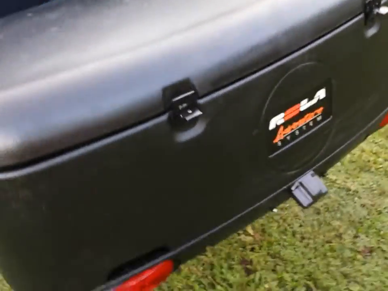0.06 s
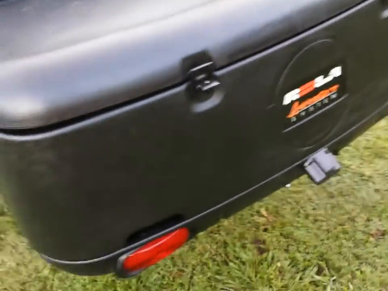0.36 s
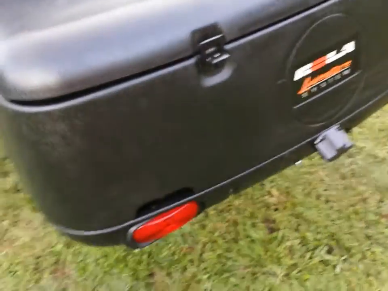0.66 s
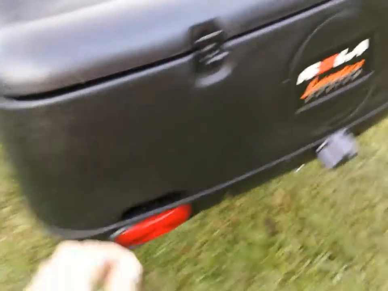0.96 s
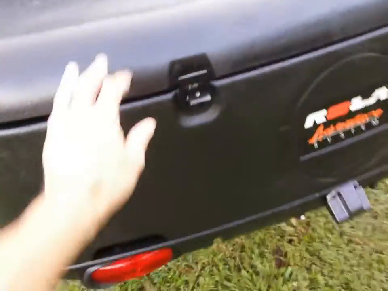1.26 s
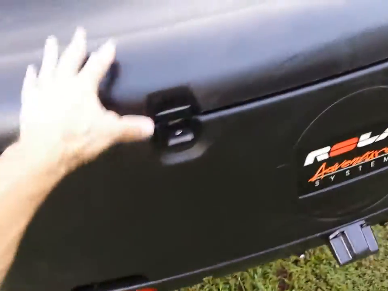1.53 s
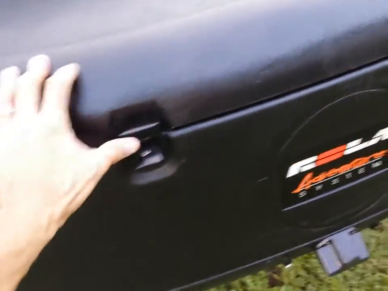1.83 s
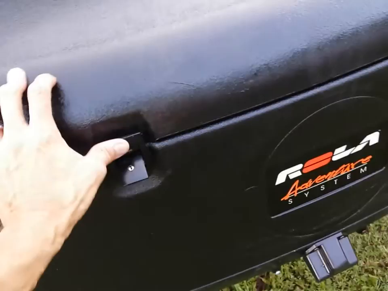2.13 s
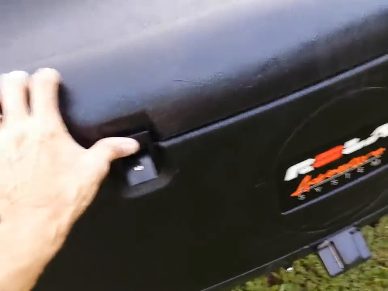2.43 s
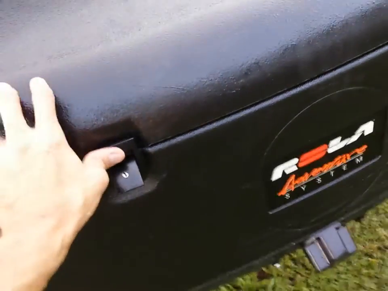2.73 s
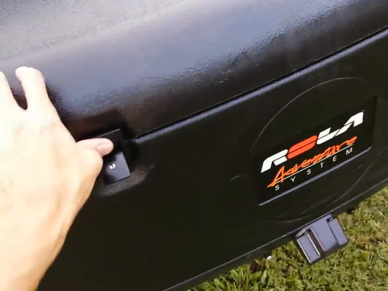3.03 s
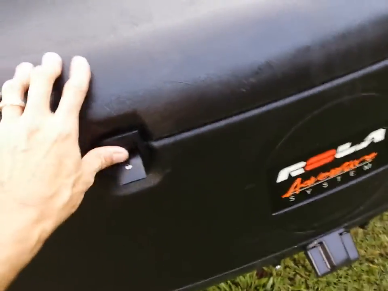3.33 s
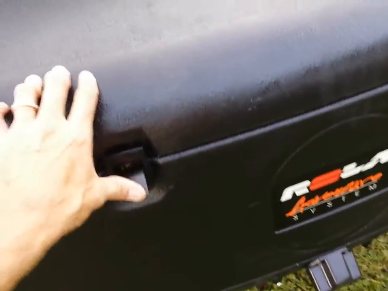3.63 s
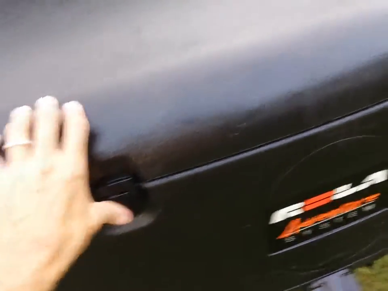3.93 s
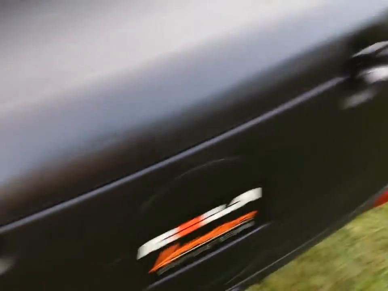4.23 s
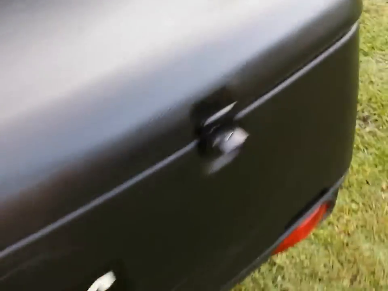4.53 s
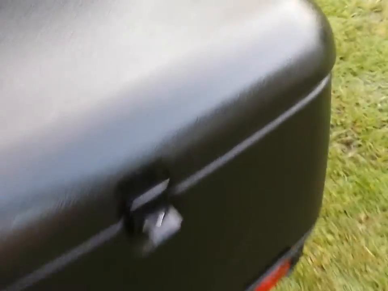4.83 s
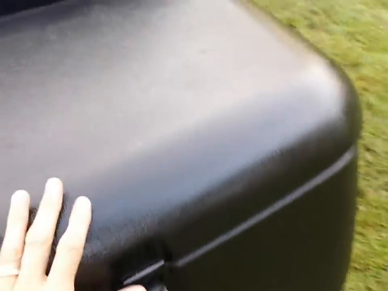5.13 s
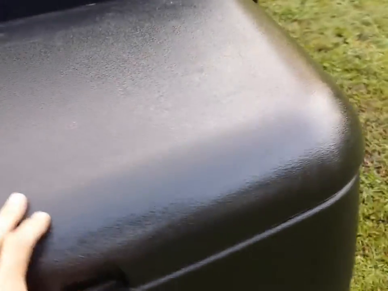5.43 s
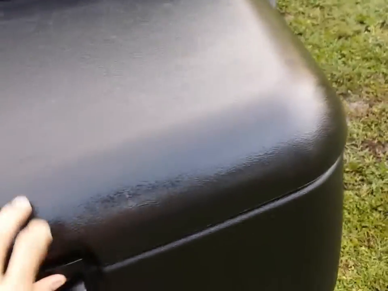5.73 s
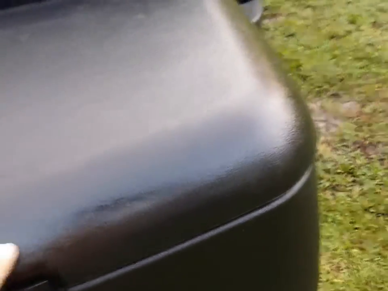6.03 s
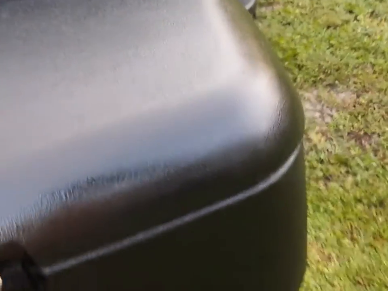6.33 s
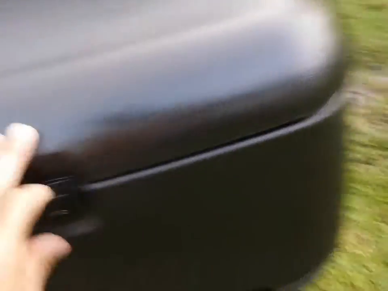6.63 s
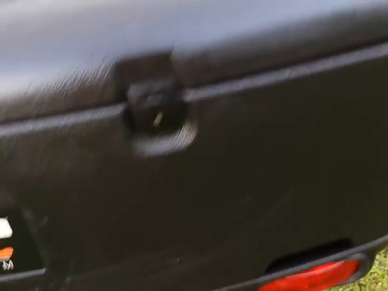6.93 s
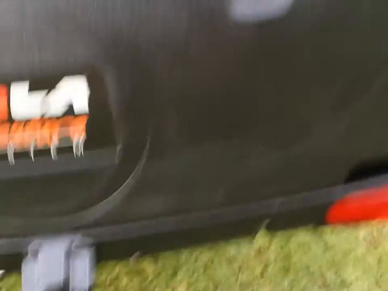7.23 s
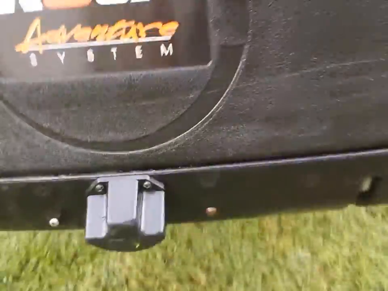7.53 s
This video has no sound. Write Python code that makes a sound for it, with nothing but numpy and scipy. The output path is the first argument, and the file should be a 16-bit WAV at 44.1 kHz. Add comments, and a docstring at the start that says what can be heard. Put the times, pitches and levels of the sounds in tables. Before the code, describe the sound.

Outdoors, faint high crickets chirp over a quiet, distant rumble. After a soft rustle and bump around 1.5 seconds, a hand works a metal latch on a hollow plastic cargo box, close to the microphone. It clicks sharply at 2 seconds, then snaps at 2.3 with a deep thump of the lid, the loudest moment. Soft, dull knocks follow until 3 seconds. Another click comes at 3.2 and a quick cluster of steely clacks and hollow thuds at about 3.7. Light taps and rustles of clothing and grass fill 4 to 5.3 seconds. A second latch snaps at 5.4, ticks lightly, and snaps again at 6.2, trailed by a brief hiss. The hits are short, with a slight dull echo. The crickets and rumble sink from about 5.6 seconds, and the rumble returns with a faint rustle near the end at 7.5.

```python
"""Crickets chirp on a lawn over a distant rumble; then a hand works the metal latches of a
hollow plastic cargo box, the loudest thing in the scene. Each blow is a steel tick, a crack of the
lever, a clack of the shell, a thud of the panels and a boom of the lid, with dull echoes off nearby
walls. Clothes and grass rustle in tiny grains, and the crickets' wing strokes make a high trill."""
import sys
import numpy as np
from scipy import signal
from scipy.fft import rfft, irfft, next_fast_len
from scipy.io import wavfile

SR = 44100
rng = np.random.default_rng(int(sys.argv[2]) if len(sys.argv) > 2 else 0)


def file_out(sig):
    """Save sig as 16-bit WAV at sys.argv[1]."""
    # one column per channel
    cols = np.atleast_2d(sig).T
    # limit, then scale
    lim = np.clip(cols, -1, 1)
    pcm = np.round(lim * 32767).astype(np.int16)
    wavfile.write(sys.argv[1], SR, pcm)


N = 333875
TIME = np.arange(N) / SR
BLOW_AGE = np.arange(int(.36 * SR)) / SR
BAND_TOP_HZ, HISS_TOP_HZ = 16300, 15600


def latches(metal_db=-1):
    """Every blow rings five parts; the heavier the part, the slower its attack and its first fall."""
    blows = np.array([*snaps(), *hook_ticks(), *knocks(), *lid_jolts()])
    starts, contacts, steel_db, lever_db, shell_db, panel_db, lid_db, steel_tilt, shell_tilt = blows.T
    timing = list(zip(starts, contacts))
    metal = steel_tick(timing, steel_db, steel_tilt) + lever_crack(timing, lever_db)
    box = shell_clack(timing, shell_db, shell_tilt)
    box += panel_thud(timing, panel_db) + lid_boom(timing, lid_db)
    box += wall_push(starts, shell_db + 13, width_s=.00018)
    box += wall_push(starts, panel_db + 14, width_s=.0006)
    return gain_of(metal_db) * metal + with_echoes(box)


# Latch snaps: start_s, contact_s, level_db, steel_over_shell_db, weight_db, steel_tilt_db_per_octave
LATCH_SNAPS = [(2.0279, 0.0021, -25, -5.5, -8.5, 2), (2.333, 0.00055, -22.5, -1, 0, -5),
               (3.2485, 0.0017, -29, -1.5, 0.5, 1), (3.694, .001, -27, -.5, -5.5, 10.5),
               (3.7112, .0026, -32, -9.5, 2.5, 1), (3.7247, 0.0019, -25.5, -20, -2.5, -7),
               (3.749, 0.0014, -27.5, 2, 9, -3), (5.3826, .0009, -24.5, -3.5, -15.5, -3),
               (5.384, .0015, -25, 5.5, 1, -3.5), (6.2217, .01, -34, -5, -3.5, 10),
               (6.2357, 0.00078, -26.5, 5, 0.5, 5.5)]
def snaps():
    """The lever springs or slams home; the more weight reaches the box, the deeper and duller the hit."""
    for start_s, contact_s, db, steel_db, weight_db, steel_tilt in LATCH_SNAPS:
        lever_db = -9 + .49 * steel_db - .5 * weight_db
        parts_db = db + np.array([steel_db, lever_db, 0, weight_db + 1, weight_db - 9])
        yield start_s, contact_s, *parts_db, steel_tilt, -.64 * weight_db


# Small ticks of the hook: start_s, contact_s, level_db
HOOK_TICKS = [(2.0071, 0.0011, -43.5), (2.278, 0.0052, -40), (2.3416, 0.00058, -38), (5.513, .0013, -58),
              (6.037, .0025, -55), (6.0747, .0014, -51.5), (6.146, 0.01, -40), (6.529, 0.0024, -59.5)]
def hook_ticks(steel_tilt=5, shell_tilt=2):
    """The loose hook touches its keeper: light steel that hardly stirs the box."""
    for start_s, contact_s, db in HOOK_TICKS:
        parts_db = db + np.array([0, -15, -12, -13, -15])  # steel, lever, shell, panels, lid
        yield start_s, contact_s, *parts_db, steel_tilt, shell_tilt


# Handling knocks: start_s, level_db, hardness_db_per_octave
SHELL_KNOCKS = [(1.585, -45, -3), (2.004, -41, 0), (2.283, -42, 8), (2.501, -48.5, 5), (2.662, -38.5, -7),
                (2.7517, -36, -5), (2.812, -42.5, -8.5), (2.973, -46, -8), (3.022, -41.5, -8),
                (3.6338, -38, 2.5), (3.646, -41.5, 2), (4.3162, -46, 9), (4.369, -45, 7), (5.137, -43.5, 0),
                (5.297, -49, 3.5), (5.3141, -42.5, -5), (5.523, -41.5, -8.5), (6.545, -58.5, 1.5),
                (6.99, -58, 6)]
def knocks(contact_s=.0028, steel_tilt=3):
    """Thumb and lever knock on the shell; a harder knock is brighter and rattles the latch more."""
    for start_s, db, hardness in SHELL_KNOCKS:
        parts_db = db + np.array([hardness - 12, hardness - 16, 0, -4, -10])
        yield start_s, contact_s, *parts_db, steel_tilt, hardness


# Low bumps of the lid: start_s, level_db, lid_over_panels_db
LID_JOLTS = [(2.004, -37, 9.5), (2.283, -36, 25), (2.333, -16, 11.5), (2.485, -34.5, 7), (3.696, -28, 7),
             (3.971, -38.5, 2), (5.3151, -39, -0.5), (6.274, -38, -8)]
def lid_jolts(contact_s=.0016, steel_tilt=0, shell_tilt=-2):
    """The lid jumps or settles on its rim as a whole: a boom with little clack and almost no metal."""
    for start_s, db, depth_db in LID_JOLTS:
        parts_db = db - depth_db + np.array([-23, -23, -12, 0, depth_db])
        yield start_s, contact_s, *parts_db, steel_tilt, shell_tilt


# Bright ring of the steel: pitch_hz, level_db, t60_s
STEEL_RING = [(5030, -8, 0.043), (5600, -3, .03), (5870, 9, 0.034), (6400, -9, 0.03), (7950, 1, 0.011),
              (7950, -7.5, 0.039), (8500, -3, 0.024), (8990, 0, 0.026)]
# Its wash of weaker modes: pitch_hz, level_db
STEEL_WASH = [(2500, -21.5), (4000, -15.5), (4800, -1.5), (6200, 4), (8500, -1.5), (10200, -14),
              (15000, -21), (17000, -32)]
def steel_tick(timing, levels_db, tilts):
    """Steel hits steel with an instant attack and a thin, high ring."""
    return struck(timing, levels_db, STEEL_WASH, STEEL_RING, tilts=tilts, modes_db=-6, rise_s=.0001,
                  decays=[(0, .002), (-12, .039), (-37, .47)])


# Midrange ring of the lever: pitch_hz, level_db, t60_s
LEVER_RING = [(2350, -3.5, 0.098), (2710, -7.5, 0.055), (2840, -4.5, 0.037), (3120, -0.5, 0.026),
              (3480, -5.5, .035), (3740, -9, .035), (4070, -3, .03)]
# Its wash of weaker modes: pitch_hz, level_db
LEVER_WASH = [(1100, -27), (2200, -2.5), (3000, -2), (4200, 0), (5500, -15), (9000, -39.5)]
def lever_crack(timing, levels_db):
    """The lever rings below the steel and gives the blow its bite."""
    return struck(timing, levels_db, LEVER_WASH, LEVER_RING, modes_db=-2.5, rise_s=.0001,
                  decays=[(0, .0053), (-13, .06), (-30.5, .57)])


# Hollow ring of the shell: pitch_hz, level_db, t60_s
SHELL_RING = [(766, 1, 0.19), (926.4, 1.5, 0.25), (1017, -2, .18), (1193, -2.5, 0.13), (1344, -2, 0.088),
              (1454, -2.5, .14), (1705, -5, .15), (1840, -9.5, 0.12), (1976, 3, 0.069)]
# Its wash of weaker modes: pitch_hz, level_db
SHELL_WASH = [(350, -27.5), (600, -3), (900, 5), (1400, 4), (2000, -2), (2700, -18), (4200, -23),
              (8000, -49.5)]
def shell_clack(timing, levels_db, tilts):
    """The plastic shell answers with a hollow clack."""
    return struck(timing, levels_db, SHELL_WASH, SHELL_RING, tilts=tilts, modes_db=-4, rise_s=.00016,
                  decays=[(0, .04), (-18.5, .12), (-23, .42)])


# Boxy ring of the panels: pitch_hz, level_db, t60_s
PANEL_RING = [(211, -8, 0.25), (264.8, -7, 0.37), (288, 1, 0.19), (312.5, -5.5, 0.18), (356.8, 6, 0.19),
              (419, -6.5, .21), (592, -11.5, 0.24), (660, -9.5, 0.12)]
# Their wash of weaker modes: pitch_hz, level_db
PANEL_WASH = [(100, -26.5), (200, 3.5), (330, 3), (420, 4), (520, -12.5), (750, -10), (1300, -41.5),
              (3000, -66)]
def panel_thud(timing, levels_db):
    """The panels flex and give the blow its body."""
    return struck(timing, levels_db, PANEL_WASH, PANEL_RING, modes_db=-.5, rise_s=.0014,
                  decays=[(0, .07), (-10, .2), (-18.5, .5)])


# Bass ring of the lid: pitch_hz, level_db, t60_s
LID_RING = [(73.1, -7, 0.28), (117.4, -0.5, 0.36), (136.5, -1.5, 0.2), (175.2, -14, 0.49)]
# Its wash of weaker modes: pitch_hz, level_db
LID_WASH = [(20, -32), (45, -6), (75, -16.5), (130, 3.5), (190, 3), (300, -23), (900, -64), (3000, -84)]
def lid_boom(timing, levels_db):
    """The heavy lid speaks last and carries the low end."""
    return struck(timing, levels_db, LID_WASH, LID_RING, modes_db=6, rise_s=.0025,
                  decays=[(0, .085), (-9.5, .22), (-17.5, .52)])


# Stereo placement of the blows: pitch_hz, left_minus_right_db
BLOW_PAN = [(100, 1.5), (350, 0.5), (900, 3.5), (1600, 7.5), (3300, -1), (6000, 4), (9000, -3), (14000, -1)]
def struck(timing, levels_db, colour, modes, modes_db, rise_s, decays, tilts=0):
    """One part under all blows: clear modes plus a noise wash that holds through the contact."""
    hz, _, t60 = np.transpose(modes)[:, :, None]
    waves = dying(BLOW_AGE, t60) * np.exp(2j * np.pi * hz * BLOW_AGE)
    # The wash dies as a quick fall, a ring and a faint tail, each a (level_db, t60_s) pair.
    fall = sum(gain_of(db) * dying(BLOW_AGE, t60_s) for db, t60_s in decays)
    attack = 1 - np.exp(-BLOW_AGE / rise_s)
    out = np.zeros((2, N))
    for (start_s, contact_s), db, tilt in zip(timing, levels_db, np.broadcast_to(tilts, len(timing))):
        wash = noise(colour, BLOW_PAN, size=len(BLOW_AGE), tilt=tilt)
        wash *= np.interp(BLOW_AGE - contact_s, BLOW_AGE, fall)
        ring = (mode_shares(modes, tilt) @ waves).imag
        hit = (wash + gain_of(modes_db) * ring) * attack
        onset_rms = np.sqrt(np.mean(hit[:, BLOW_AGE < .03] ** 2))
        add(out, start_s, gain_of(db) * hit / onset_rms)
    return out


def mode_shares(modes, tilt, scatter_db=2):
    """Each blow lands differently on the modes; high ones reach left and right out of step."""
    hz, db, _ = np.transpose(modes)
    luck, lag = rng.standard_normal((len(modes), 2)).T
    sides = np.array([[.5], [-.5]])
    phase_gap = lag * np.arccos(likeness(hz))
    strength = gain_of(db + scatter_db * luck + tilt * np.log2(hz) + sides * read(BLOW_PAN, hz))
    return strength / np.linalg.norm(strength) * np.exp(1j * sides * phase_gap)


def wall_push(starts, levels_db, width_s):
    """Each blow dents the box wall and lets it go: one swing of air pressure, dead centre."""
    age = BLOW_AGE[BLOW_AGE < .02] / width_s
    swing = -age * (2 - age) * np.exp(-age)
    out = np.zeros((2, N))
    for start_s, db in zip(starts, levels_db):
        add(out, start_s, gain_of(db) * np.array([swing, swing]))
    return out


# Short slapback: delay_s, level_db
WALL_ECHOES = [(0.0187, -18), (0.0297, -14.5), (.039, -27.5)]
def with_echoes(box, cutoff_hz=900):
    """The sound of the box comes back, dulled, from nearby walls."""
    dull = signal.sosfilt(signal.butter(2, cutoff_hz, fs=SR, output="sos"), box)
    out = box.copy()
    for delay_s, db in WALL_ECHOES:
        add(out, delay_s, gain_of(db) * dull)
    return out


# Fader ride on the near crickets: time_s, level_db
CHIRP_FADER = [(0, -57.5), (1, -58), (1.65, -52), (2.8, -57.5), (4, -56.5), (5.3, -55.5), (5.7, -64.5),
               (6.1, -66.5), (6.6, -73.5), (7.5, -61.5)]
# Shimmer of the far chorus: pitch_hz, level_db
CHORUS_COLOUR = [(3500, -47), (5500, -33.5), (6450, -18), (6800, -1), (7100, 0), (7450, -22), (8100, -30),
                 (8900, -16), (10000, -41)]
def crickets(first_peak_s=.035, every_s=.398, length_s=.2, near_db=-4, chorus_db=-14, trill_db=-13):
    """A near cricket chirps on two close pitches at once, trilling softly in between, over a far chorus."""
    from_peak_s = (TIME - first_peak_s + every_s / 2) % every_s - every_s / 2
    chirps = (swell(from_peak_s, length_s) + gain_of(trill_db)) * fader(CHIRP_FADER)
    pair = cricket(pitch_hz=7076, strokes_per_s=27.5, sag_hz=90, blur_hz=56)
    pair += cricket(pitch_hz=6830, strokes_per_s=28.3, sag_hz=70, blur_hz=55.3)
    chorus = noise(CHORUS_COLOUR, AMBIENCE_PAN, size=N) * fader(AMBIENCE_FADER)
    return gain_of(near_db) * pair * chirps + gain_of(chorus_db) * chorus


def cricket(pitch_hz, strokes_per_s, sag_hz, blur_hz):
    """Each wing stroke is a short rough whistle that sags in pitch; no two are equally loud."""
    stroke = np.cumsum(strokes_per_s * (1 + .17 * drift(5))) / SR % 1
    cycles = np.cumsum(pitch_hz + sag_hz * (.5 - stroke) + blur_hz * drift(350)) / SR
    force = np.sin(np.pi * stroke) ** 2 * gain_of(2.3 * drift(20))
    stereo_cycles = np.array([cycles, cycles + .18 * drift(2.4)])
    return unit_rms(force * np.sin(2 * np.pi * stereo_cycles))


# Dry hiss of the rustle: pitch_hz, level_db
RUSTLE_COLOUR = [(500, -25), (1300, 2), (2200, -4.5), (3500, -7), (5000, -3.5), (6300, 5), (7500, 2.5),
                 (9000, -4), (10200, -5.5), (15000, -8.5)]
# Short swells of hiss, rustles and the noisy tails of the two loudest snaps:
# peak_s, length_s, level_db, tilt_db_per_octave
HISS_SWELLS = [(1.47, 0.11, -51, -3.5), (3.051, 0.08, -44, -5), (4.249, 0.31, -50, -1),
               (4.759, 0.087, -50.5, -.5), (5.03, 0.085, -48.5, -1), (5.482, 0.082, -49, -5.5),
               (5.875, 0.18, -45.5, -8.5), (6.298, 0.14, -40.5, -7), (7.161, 0.24, -55, -1),
               (7.42, 0.22, -50.5, -2.5)]
def rustle(grain_db=2, scuff_db=1.17, stir_db=-12, swing_db=1.5):
    """A faint, grainy stir of cloth and grass, with short swells of hiss: rustles and two snap tails."""
    out = noise(RUSTLE_COLOUR, AMBIENCE_PAN, size=N, top_hz=HISS_TOP_HZ, tilt=-2.5)
    out *= fader(AMBIENCE_FADER) * gain_of(stir_db + swing_db * drift(2.5))
    for peak_s, length_s, db, tilt in HISS_SWELLS:
        near = abs(TIME - peak_s) < .45
        hiss = noise(RUSTLE_COLOUR, AMBIENCE_PAN, size=near.sum(), top_hz=HISS_TOP_HZ, tilt=tilt)
        out[:, near] += gain_of(db) * swell(TIME[near] - peak_s, length_s) * hiss
    grains = gain_of(grain_db * drift(250) + scuff_db * drift(45))
    return out * unit_rms(grains)


# Low bed with a little air on top: pitch_hz, level_db
RUMBLE_COLOUR = [(15, -33), (30, -11.5), (50, -5.5), (108, 2), (180, -6), (266, -12.5), (351, -8),
                 (485, -14), (825, -15), (1110, -23.5), (1700, -32), (3000, -37), (5000, -40), (8800, -34),
                 (10300, -41.5), (16000, -38.5)]
# Fader ride on rumble, stir and chorus, sinking near the end and coming back: time_s, level_db
AMBIENCE_FADER = [(0, -45.5), (.6, -48.5), (1.35, -45.5), (1.9, -48), (3.6, -45.5), (4.45, -47.5),
                  (5.35, -45), (5.6, -56.5), (6.2, -54.5), (6.5, -60.5), (7.1, -62), (7.5, -48.5)]
# Stereo placement of rumble, rustle and chorus: pitch_hz, left_minus_right_db
AMBIENCE_PAN = [(60, 3), (380, 2), (1200, 3.5), (4400, 0.5), (8000, -1), (15000, -1)]
def distant_rumble(trim_db=2, waver_db=.5):
    """A far-off rumble that wavers a little."""
    bed = noise(RUMBLE_COLOUR, AMBIENCE_PAN, size=N, top_hz=HISS_TOP_HZ)
    return bed * fader(AMBIENCE_FADER) * gain_of(trim_db - waver_db * drift(12))


# Stereo width: pitch_hz, left_right_correlation
STEREO_LIKENESS = [(60, 1), (350, 0.94), (640, 0.53), (1400, -0.01), (3000, -0.06), (6000, -0.11),
                   (15000, 0)]
def likeness(hz):
    """The two microphone ports hear alike in the bass and unrelated in the treble."""
    return np.clip(read(STEREO_LIKENESS, hz), -1, 1)


def noise(colour, pan, size, top_hz=SR / 2, tilt=0):
    """Coloured stereo noise at unit rms, tilted in dB per octave."""
    length = next_fast_len(size, True)
    hz, grid = np.fft.rfftfreq(length, 1 / SR), np.geomspace(10, SR / 2, 300)
    left, unrelated = rfft(rng.standard_normal((2, length)))
    shared = np.interp(hz, grid, likeness(grid))
    right = shared * left + np.sqrt(1 - shared ** 2) * unrelated
    pan_db = np.outer([.5, -.5], read(pan, grid))
    shapes = gain_of(read(colour, grid) + tilt * np.log2(grid) + pan_db)
    eq = np.array([np.interp(hz, grid, shape) for shape in shapes]) * (hz < top_hz)
    return unit_rms(irfft(eq * [left, right], length)[:, :size])


def drift(per_s):
    """A smooth random wander at unit rms; per_s sets its pace."""
    steps = rng.standard_normal(int(3 * per_s * N / SR) + 2)
    return unit_rms(np.interp(TIME, np.linspace(0, N / SR, len(steps)), steps))


def read(points, hz):
    """Reads a spectrum table on a log-frequency axis."""
    points_hz, values = np.transpose(points)
    return np.interp(np.log(hz + 1), np.log(points_hz + 1), values)


def fader(curve):
    """A curve in dB as a gain for every sample."""
    return gain_of(np.interp(TIME, *np.transpose(curve)))


def swell(age, length_s):
    """A smooth rise and fall around age zero."""
    return np.exp(-2 * (age / length_s) ** 2)


def dying(age, t60):
    """Falls by 60 dB in t60 seconds."""
    return np.exp(-np.log(1000) * np.clip(age / t60, 0, 10))


def gain_of(db):
    """Decibels to amplitude."""
    return 10 ** (np.asarray(db) / 20)


def unit_rms(x):
    """Scales to an rms of one."""
    return x / np.sqrt(np.mean(x ** 2) + 1e-20)


def add(mix, start_s, sound):
    """Mixes a sound in at a time."""
    part = mix[:, round(start_s * SR):][:, :sound.shape[1]]
    part += sound[:, :part.shape[1]]


def scene():
    """The latches up front, the sounds of the garden behind."""
    return latches() + crickets() + rustle() + distant_rumble()


def record(dry, low_cut_hz=47):
    """The microphone drops the deepest bass, clips at full scale and loses the very top."""
    low_cut = signal.butter(2, low_cut_hz, "high", fs=SR, output="sos")
    clipped = np.clip(signal.sosfilt(low_cut, dry), -1, 1)
    high_cut = signal.firwin(255, BAND_TOP_HZ, window=("kaiser", 8), fs=SR)
    return signal.oaconvolve(clipped, high_cut[None], "same")


dry = scene()
out = record(dry)
file_out(out)
```